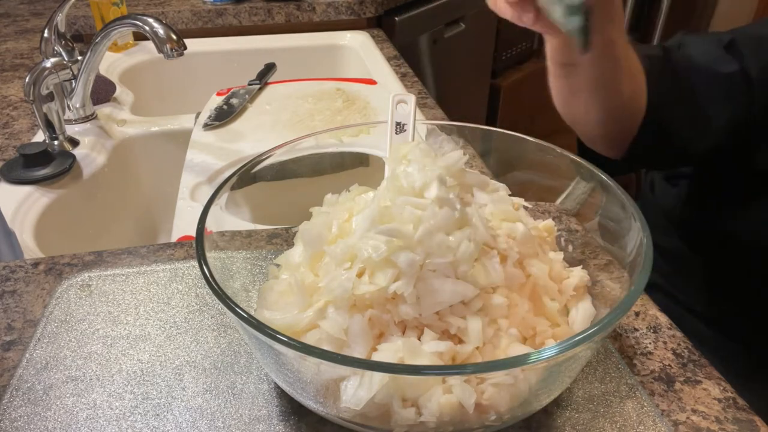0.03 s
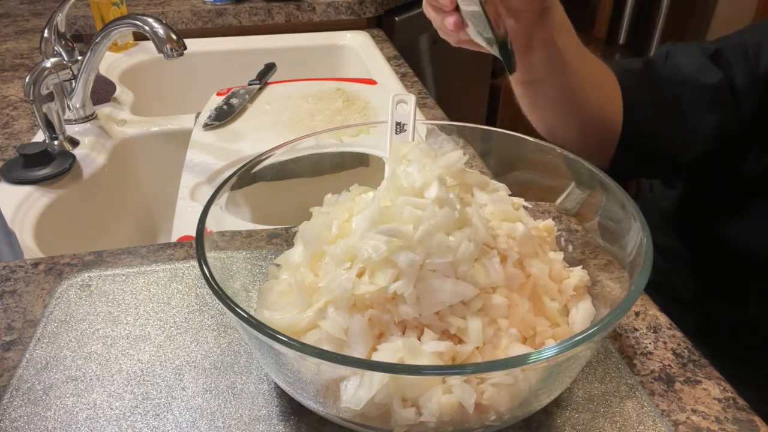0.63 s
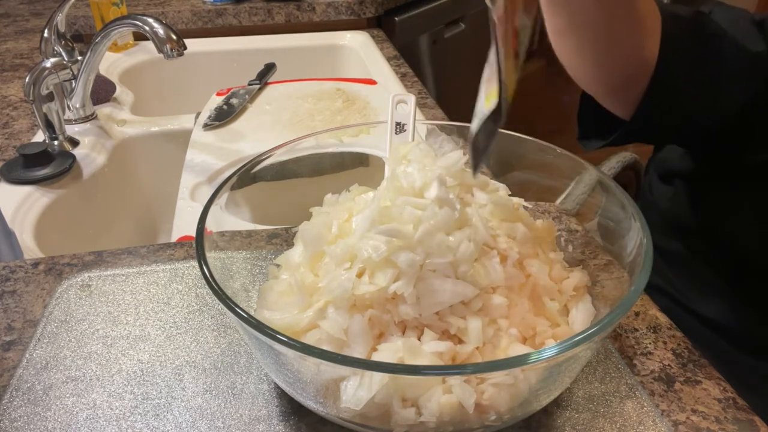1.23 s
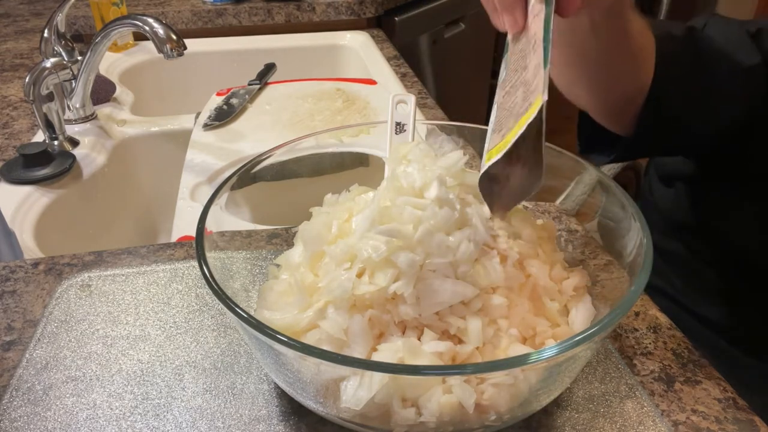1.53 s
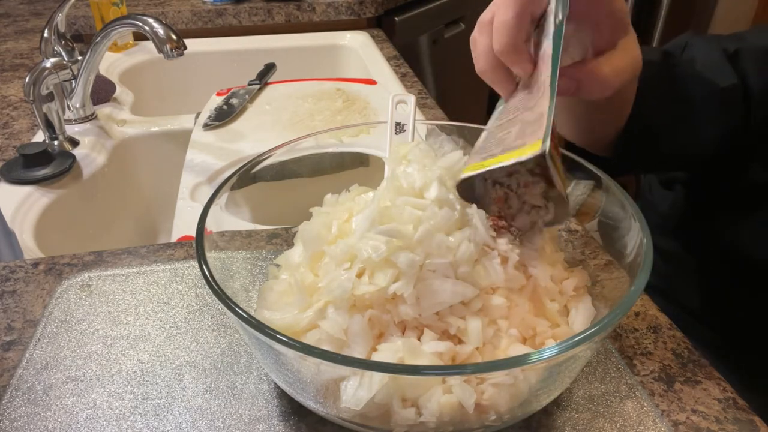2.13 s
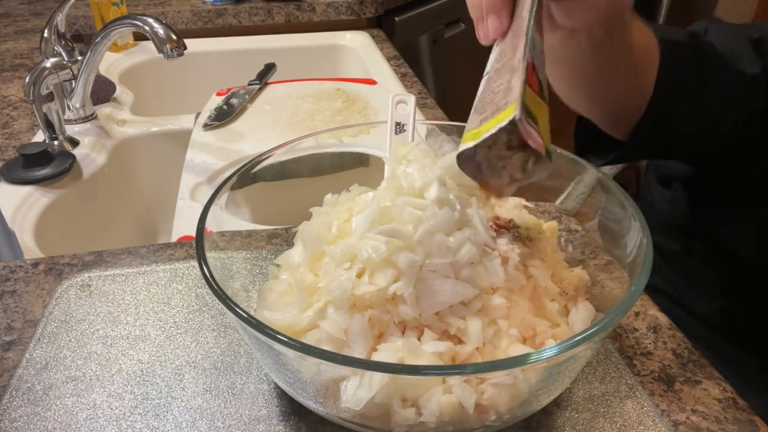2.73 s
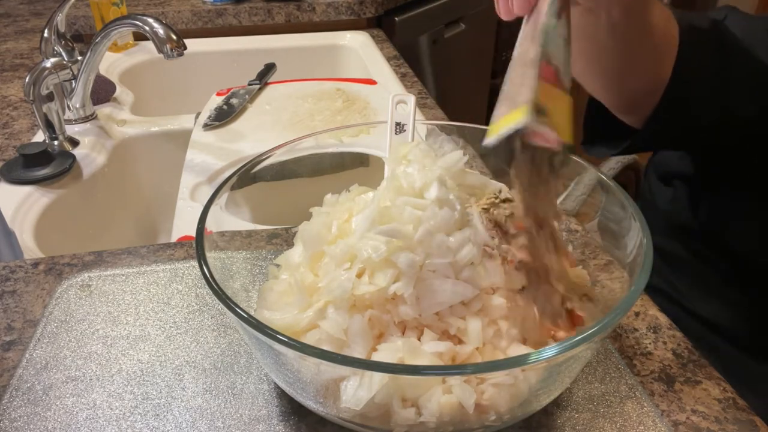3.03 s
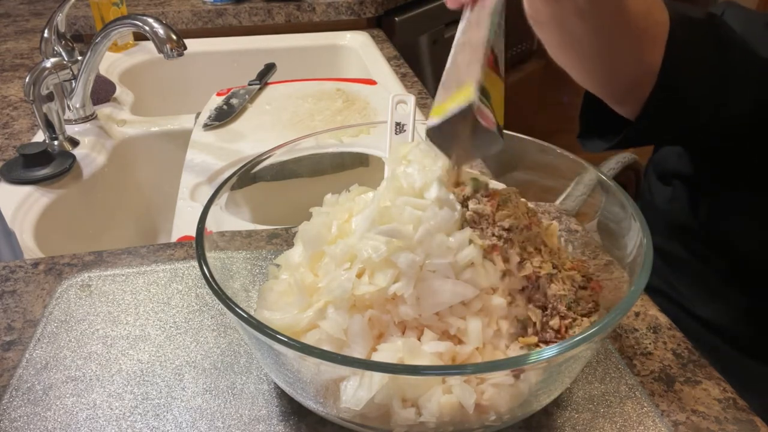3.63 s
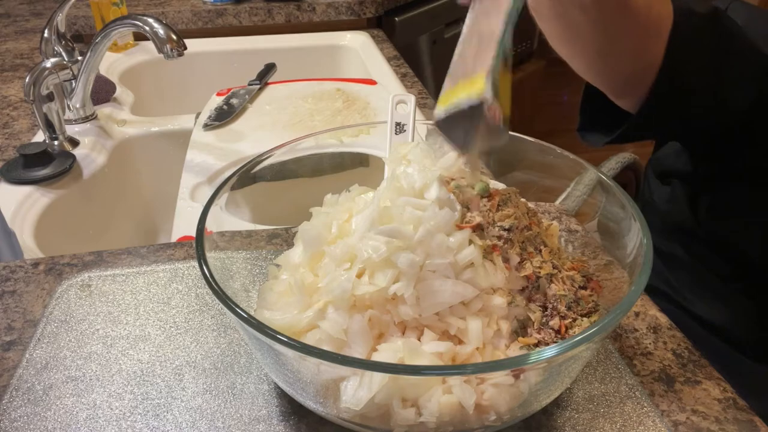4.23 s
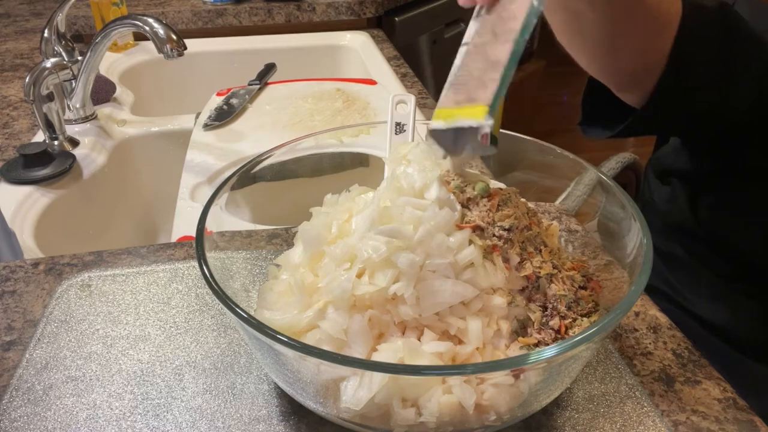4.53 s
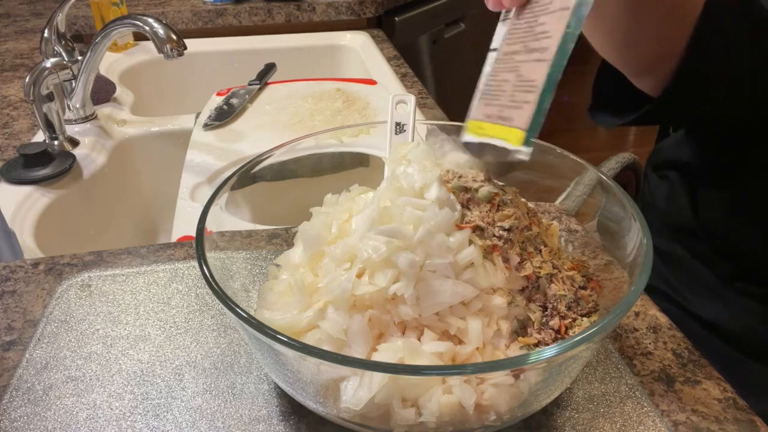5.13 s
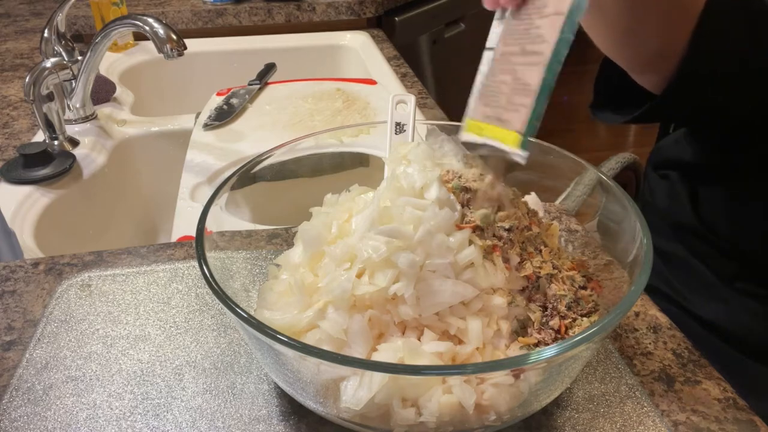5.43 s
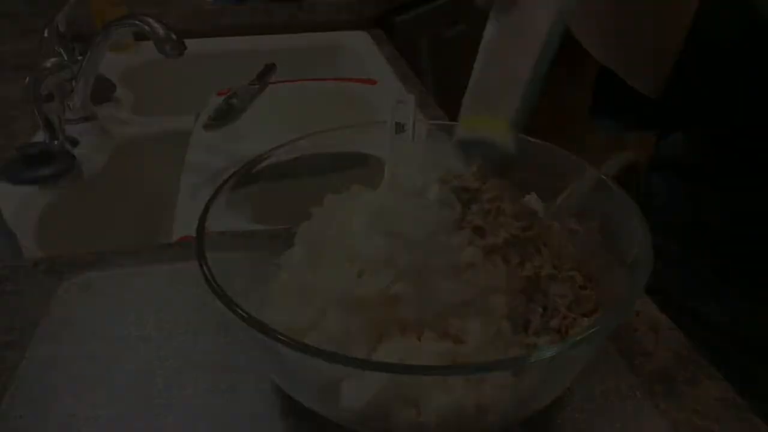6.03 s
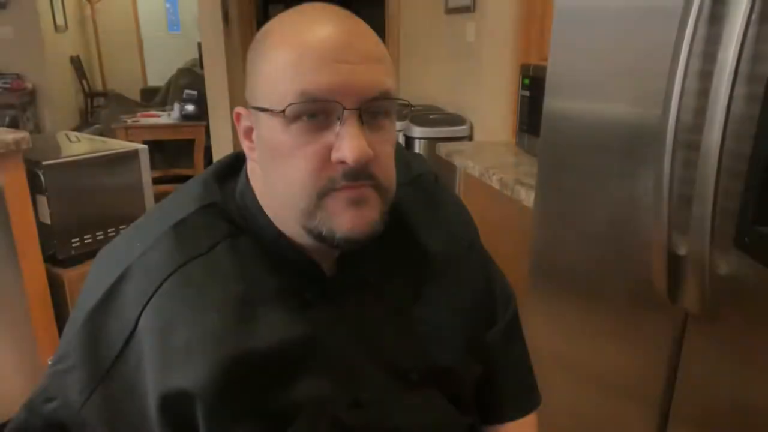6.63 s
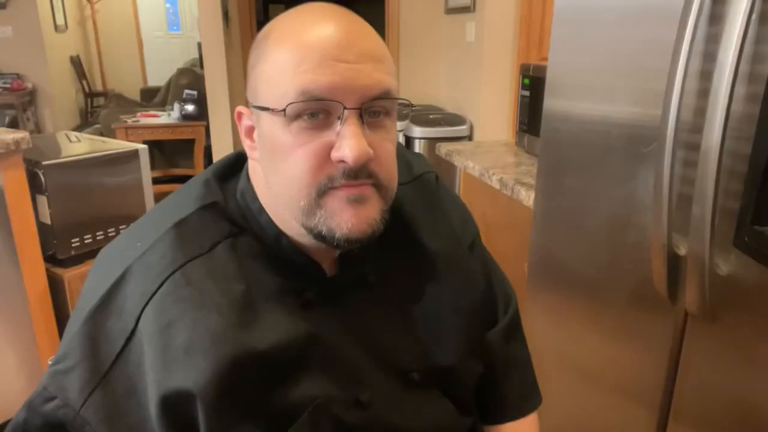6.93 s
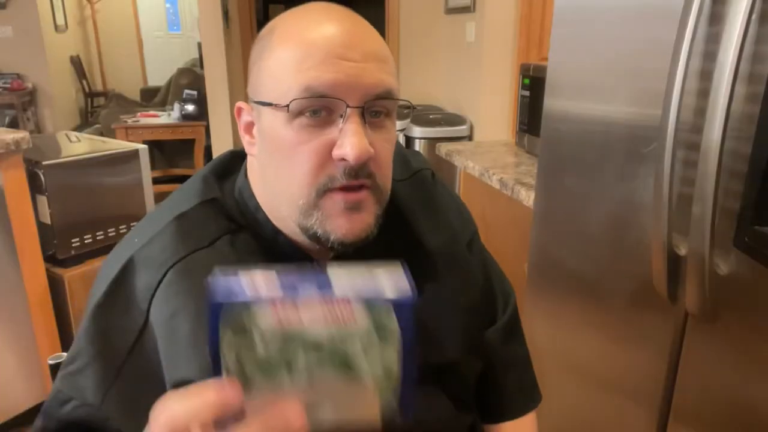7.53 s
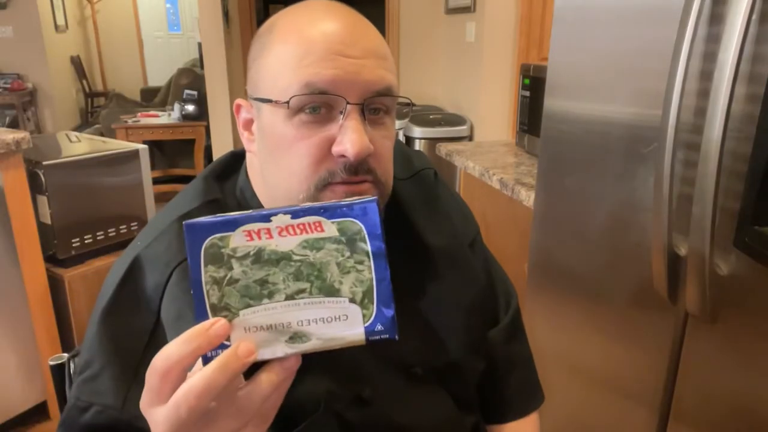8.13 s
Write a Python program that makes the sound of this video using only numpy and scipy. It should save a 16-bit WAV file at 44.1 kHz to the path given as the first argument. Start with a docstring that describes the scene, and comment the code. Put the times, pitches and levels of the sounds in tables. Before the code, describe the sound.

A stiff paper packet crinkles as dry mix is shaken into a glass bowl, then a small carton is softly handled over an appliance hum.

```python
"""A stiff paper packet is opened and shaken out over a glass bowl in a small kitchen.
Creases snap, walls rustle and the foil lining ticks; the dry mix slides out in surges and soft thuds.
At 6.28 s the scene cuts to a quieter spot in the room: a small carton is handled and lifted with
a hollow bump. An appliance motor hums throughout.
Friction and flow are filtered grain impacts; snaps and taps are noise bursts through resonances."""
import sys
import numpy as np
from scipy import signal
from scipy.fft import rfft, irfft, next_fast_len
from scipy.io import wavfile
from scipy.ndimage import uniform_filter1d, map_coordinates

SR = 44100
rng = np.random.default_rng(int(sys.argv[2]) if len(sys.argv) > 2 else 0)


def bounce(signal):
    """Save signal as a 16-bit WAV file at the path given by the first command-line argument."""
    frames = np.transpose(np.atleast_2d(signal))
    limited = np.clip(frames, -1, 1)
    pcm = np.round(limited * 32767).astype(np.int16)
    wavfile.write(sys.argv[1], SR, pcm)


N = 364574
TIME = np.arange(N) / SR
CUT_S = 6.28

# room noise spectrum (frequency [Hz], level [dB])
ROOM_TONE = [(20, -10), (45, -0.5), (80, 3.5), (120, 2), (190, -13), (280, -8), (500, -19.5), (1300, -26.5),
             (2500, -35), (8000, -48.5), (16000, -60.5)]
# motor and mains tones at the bowl, at the carton (frequency [Hz], level [dB])
NEAR_HUM = [(59.2, -53), (119.9, -72), (174.3, -75), (177.7, -72.5)]
FAR_HUM = [(59.2, -60.5), (174.3, -79.5), (177.6, -74.5)]
# microphone response to sound from the counter (frequency [Hz], gain [dB])
MIC_RESPONSE = [(100, 14.5), (270, -5), (400, -1.5), (570, -4), (715, 4.5), (880, -3), (1080, -1),
                (1400, -2), (1750, -2.5), (2150, -1), (2400, -1), (4000, 3), (8000, -1.5), (12000, -7.5),
                (16000, -4)]
# left port lag: packet upright, packet tipped, carton (frequency [Hz], phase [rad])
LAG_UPRIGHT = [(300, 0), (1380, 0), (1640, .9), (3190, .4), (4740, 1), (6290, .2), (7600, 3.5), (9560, 2.9),
               (10900, 0), (12300, 0), (13200, -2.9), (15100, -3.3), (16400, -4.7)]
LAG_TIPPED = [(300, 0), (2070, .6), (2500, 1.6), (3700, .4), (4570, 2.1), (5860, .8), (7150, 3.8),
              (9560, 2.9), (10900, 0), (12300, 0), (13200, -2.9), (15100, -3.2), (16400, -6.4)]
LAG_CARTON = [(0, 0), (2240, 1.9), (4200, 3.4), (5430, 5.5), (6460, 5.3), (8350, 3.1), (9470, 3.2),
              (10700, 0), (12300, 0), (13300, -3), (15300, -3.2)]

# hand and sleeve on the carton (time [s], rise [s], fall [s], rub [dB], hiss [dB])
SLIDES = [(6.36, 0.073, 0.09, -64.5, -76.5), (6.61, 0.015, 0.08, -75.5, -67.5),
          (6.821, 0.034, 0.058, -71, -65), (7.091, 0.043, 0.069, -60.5, -64), (7.285, 0.055, 0.1, -59, -66),
          (7.41, 0.038, 0.044, -55.5, -65), (7.501, 0.049, 0.16, -63.5, -69),
          (7.96, 0.027, 0.031, -80.5, -73)]
# card friction spectra (frequency [Hz], level [dB])
CARTON_RUB = [(150, 10), (350, 5), (550, 2.5), (750, 9), (1100, 0.5), (1450, 1), (2000, 1.5), (2800, -1.5),
              (4500, -12)]
CARTON_HISS = [(1500, -11), (2800, -1.5), (4500, -4), (7000, -5), (10000, -6), (16000, -11.5)]
# fingers tapping the carton (time [s], panel [dB], panel [Hz], scratch [dB])
TAPS = [(6.415, -56.5, 960, -63.5), (6.6105, -57, 783, -85), (6.841, -56, 837, -68),
        (6.977, -61, 935, -93.5), (7.0454, -55.5, 990, -62.5), (7.097, -53.5, 990, -78),
        (7.153, -51, 1430, -66), (7.2387, -42, 1280, -45.5), (8.0743, -64, 1165, -85.5)]
# carton bumps on lifting (time [s], level [dB], pitch [Hz])
BUMPS = [(7.403, -38, 367), (7.4142, -40.5, 306), (7.4419, -44.5, 355)]

# resonances of the half-open pouch, of its side panels (centre [Hz], width [Hz], gain [dB])
POUCH_MODES = [(382, 370, -2.5), (722, 60, -7), (834, 56, -9.5), (1075, 98, -2), (1400, 200, -6.5),
               (2050, 49, -4), (2520, 140, -13.5)]
PANEL_MODES = [(458, 220, -15), (690, 220, -12), (1030, 140, -6), (1450, 250, 1), (2096, 300, -1.5)]
# spectra: rubbed paper, powder, scraping walls, buckling walls (frequency [Hz], level [dB])
PAPER_HISS = [(1500, -19.5), (2800, -1.5), (4000, -7), (5500, -8.5), (8000, 1), (10000, -4.5),
              (12500, -1.5), (16000, -19.5)]
POWDER_HISS = [(1500, -5), (2800, -19.5), (4000, -5), (6000, -2), (8000, 3.5), (10000, 0.5), (12500, 2),
               (16000, -13)]
SCRAPE_SPECTRUM = [(1200, -35), (1750, 11), (2600, 8), (3300, 3), (4300, 1), (5200, -30), (9000, -47)]
BUCKLE_SPECTRUM = [(170, -15.5), (260, -1), (370, 0.5), (520, -13.5), (900, -15.5), (2000, -38)]
# grip friction on the packet (time [s], level [dB])
GRIP = [(0, -90), (.32, -81), (.7, -64), (.85, -66), (1.1, -58), (1.75, -58.5), (2.1, -67), (2.48, -71),
        (2.62, -71.5), (2.73, -65.5), (2.82, -56), (3.17, -55), (3.37, -68.5), (3.6, -64), (3.78, -72),
        (4.05, -67.5), (4.33, -64.5), (4.39, -70), (4.48, -67), (4.54, -71), (4.7, -68), (4.9, -67.5),
        (5.14, -67), (5.3, -59.5), (5.55, -61), (5.63, -72), (5.85, -73), (6.05, -76)]
# fingers squeezing the packet open (time [s], rise [s], rustle [dB], hiss [dB])
RUBS = [(.03, 0.065, -54, -57.5), (0.243, 0.032, -61.5, -68), (.47, 0.087, -61, -61.5),
        (.6, 0.033, -74, -61), (.93, 0.019, -53, -48.5), (1.176, 0.04, -53.5, -49.5),
        (1.331, 0.014, -50.5, -49.5), (1.511, 0.066, -52.5, -51.5), (1.605, 0.053, -48.5, -48.5),
        (1.89, 0.081, -46.5, -50.5), (2.2, 0.11, -52.5, -59), (2.505, 0.025, -56, -58.5)]
# shakes throwing the mix (time [s], rise [s], mix [dB], walls [dB])
SHAKES = [(2.897, 0.024, -45.5, -71), (3.024, 0.024, -45, -57.5), (3.08, 0.018, -50, -73),
          (3.157, 0.025, -43, -60), (3.28, 0.028, -54.5, -76), (3.42, 0.023, -53.5, -74),
          (3.5, 0.022, -56, -63), (3.581, .024, -49.5, -61), (3.703, 0.029, -58.5, -71),
          (3.86, 0.031, -56.5, -51), (4.003, 0.025, -53.5, -64), (4.095, 0.019, -60, -55),
          (4.126, 0.0041, -59, -63), (4.159, 0.012, -48, -71), (4.237, .012, -66, -57.5),
          (4.305, 0.026, -57.5, -67), (4.445, 0.029, -57, -53.5), (4.612, .014, -65, -70),
          (4.643, 0.0044, -57, -80), (4.731, 0.012, -54, -64), (4.78, 0.028, -57.5, -82),
          (4.84, 0.017, -58, -84), (4.89, 0.0089, -47, -54.5), (4.925, .02, -46, -61),
          (5.018, 0.016, -51, -71), (5.075, 0.017, -50.5, -56), (5.21, 0.036, -56.5, -76),
          (5.271, 0.0094, -50.5, -68), (5.357, 0.013, -43.5, -59), (5.378, 0.0067, -45, -54),
          (5.445, 0.025, -61, -72), (5.51, 0.017, -46.5, -65), (5.607, 0.0062, -63, -87),
          (5.659, 0.007, -60, -86), (5.686, 0.0095, -60, -84), (5.81, .008, -57, -81),
          (5.988, 0.013, -68.5, -87), (6.139, 0.023, -50, -62), (6.216, 0.016, -56.5, -66),
          (6.269, 0.016, -55.5, -70)]
# walls scraping, walls buckling (time [s], rise [s], fall [s], level [dB])
SCRAPES = [(2.278, 0.019, 0.098, -57), (2.45, 0.02, 0.023, -55.5)]
BUCKLES = [(.055, .01, 0.029, -55), (2.38, 0.01, 0.016, -61), (2.745, 0.0088, 0.013, -58),
           (3.235, 0.014, 0.016, -66), (4.14, .016, 0.013, -53), (5.41, 0.0084, 0.013, -49),
           (5.448, .008, 0.01, -52), (5.73, 0.0089, 0.022, -56.5), (6.025, 0.0072, 0.022, -61.5),
           (6.165, 0.014, 0.016, -53.5)]
# foil lining ticks (time [s], level [dB])
FOIL_TICKS = [(.2154, -64), (0.253, -59), (0.486, -47), (.583, -52.5), (.754, -58), (0.9407, -47),
              (1.0405, -53), (1.157, -43.5), (2.222, -56), (2.372, -58), (2.454, -56), (2.801, -48),
              (3.348, -56), (3.3883, -58), (3.4152, -59), (3.5469, -55), (3.798, -58), (3.8562, -45.5),
              (3.8786, -48), (3.98, -56), (4.0073, -53), (4.0777, -55), (4.244, -50.5), (4.8815, -60),
              (5.071, -45), (5.093, -62), (5.268, -55), (5.358, -47), (5.7127, -49.5), (5.913, -55)]
# clumps landing (time [s], level [dB], pitch [Hz], pouch [dB])
THUDS = [(2.866, -34.5, 1330, -55), (3.144, -37, 1430, -60), (3.171, -28.5, 1510, -51),
         (3.264, -38, 1580, -67), (3.4, -32, 1270, -50), (3.421, -31, 1450, -54), (3.439, -39, 1370, -64),
         (3.568, -32, 1500, -55), (3.594, -31.5, 1400, -68), (3.702, -43, 1190, -56),
         (3.861, -28, 1350, -43.5), (3.879, -28.5, 1060, -67), (4.006, -34, 1500, -54),
         (4.149, -42, 1440, -53), (4.307, -32.5, 1340, -50), (4.426, -32.5, 1370, -41),
         (4.457, -35.5, 1310, -62), (4.506, -34.5, 1560, -53), (5.413, -38.5, 1440, -48)]
# crease snaps (time [s], panel [dB], panel [Hz], pouch [dB], crack [dB], crack [Hz], length [s])
SNAPS = [(0.031, -37.5, 1510, -42.5, -38, 3400, 0.00067), (0.154, -45, 1300, -50, -59, 4000, 0.00086),
         (.2182, -52, 1700, -48, -49.5, 4500, 0.0016), (0.3445, -50, 1620, -56, -58.5, 3800, 0.0013),
         (0.388, -57, 1550, -60, -63, 4000, 0.0042), (0.485, -56, 2100, -79, -50, 5500, 0.0015),
         (0.604, -56, 1670, -77, -49.5, 4800, 0.0026), (0.654, -54, 2070, -61, -78, 4000, 0.00078),
         (0.755, -61, 1760, -60, -59.5, 3980, 0.00087), (0.879, -54, 1490, -60, -53.5, 4000, .0094),
         (0.915, -41, 1820, -60, -40, 3900, .0028), (0.941, -48, 1720, -62, -40.5, 4540, 0.002),
         (1.021, -50.5, 1420, -72, -65, 4000, 0.0084), (1.041, -65, 1470, -50, -52, 4500, .0025),
         (1.091, -47, 2390, -75, -51.5, 3780, .0041), (1.154, -42.5, 2190, -50.5, -38.5, 3450, 0.00029),
         (1.56, -44.5, 1140, -64, -62, 4000, 0.0041), (1.778, -46.5, 2540, -56, -45, 4350, .0005),
         (1.814, -41, 950, -45, -58, 4000, 0.0014), (1.83, -47, 1010, -45.5, -57, 4000, 0.0039),
         (1.849, -37.5, 790, -50, -59, 4000, 0.0034), (1.857, -43, 745, -63, -58, 4000, 0.0019),
         (1.92, -28.5, 1130, -41.5, -26, 4150, 0.0022), (1.9305, -38, 1008, -45.5, -39, 4000, .003),
         (1.9405, -39, 980, -55, -39, 4000, .003), (1.976, -39, 1810, -41, -39, 5900, .0021),
         (2.0284, -40, 1950, -36, -38, 4250, 0.0015), (2.064, -48.5, 1140, -51, -68, 4000, 0.0015),
         (2.151, -43.5, 1020, -46, -70, 4000, 0.0052), (2.159, -47, 845, -43, -68, 4000, 0.0049),
         (2.264, -35, 1400, -39, -44.5, 3130, 0.00053), (2.27, -47, 1170, -51.5, -65, 3200, .0025),
         (2.436, -43, 1270, -51.5, -38, 6100, 0.0022), (2.54, -54.5, 1260, -48.5, -60.5, 4000, 0.0018),
         (2.6783, -46, 1500, -68, -48.5, 4300, 0.0042), (2.756, -55.5, 1140, -62, -74, 4000, .0034),
         (2.803, -46.5, 1800, -55, -42, 3940, 0.0017), (3.9305, -60, 900, -55, -52.5, 6070, 0.0021),
         (4.087, -47.5, 1280, -60, -49, 4220, 0.0074), (4.234, -46.5, 1460, -49.5, -64, 3400, 0.0074),
         (4.334, -57, 1170, -70, -53.5, 5000, .0007), (4.58, -53, 1760, -49, -48.5, 5400, .0035),
         (4.66, -48.5, 1480, -57.5, -56, 4560, 0.0016), (5.02, -56, 1830, -51.5, -47.5, 5500, .002),
         (5.061, -50, 1800, -52, -60, 4000, .003), (5.102, -47, 1440, -68, -53, 3420, 0.0022),
         (5.159, -54.5, 1430, -57.5, -49.5, 5500, .004), (5.21, -53, 1550, -77, -54, 4500, 0.0039),
         (5.272, -56, 2080, -58, -48, 4800, .0034), (5.3573, -39.5, 1410, -45, -62, 4000, 0.008),
         (5.3578, -38.5, 1310, -46, -57, 4000, .004), (5.559, -56, 1820, -59, -52, 3800, 0.0025),
         (5.718, -59.5, 2170, -52, -60, 4500, .0005), (5.756, -72, 900, -57, -62, 5030, .0033),
         (5.791, -70, 2470, -75, -51.5, 5060, 0.0019), (5.806, -67, 1020, -67, -78, 4000, .007),
         (5.839, -65, 1830, -58, -60.5, 4800, .0015), (5.967, -64, 1100, -78, -66, 4000, 0.0058),
         (6.066, -65.5, 800, -56, -77, 4000, 0.0055), (6.194, -55, 1500, -49.5, -57, 4000, 0.0024),
         (6.221, -46, 1460, -47, -58, 3600, 0.0029)]


def undb(db):
    """Decibels to gain."""
    return 10 ** (np.asarray(db) / 20)


def unit(x):
    """Scale to rms 1."""
    return x / np.sqrt(np.mean(x ** 2))


def struck(x, db):
    """Set the rms level of the first 10 ms."""
    return x * undb(db) / np.sqrt(np.mean(x[:SR // 100] ** 2))


def add(track, time_s, x):
    """Mix x into the track at time_s."""
    i = max(int(time_s * SR), 0)
    track[i:i + len(x)] += x[:N - i]


def colour(x, spectrum):
    """Filter by a (frequency [Hz], gain [dB]) outline; roll off below its first point."""
    hz, db = np.transpose(spectrum)
    grid_hz = np.maximum(np.fft.rfftfreq(2 * N, 1 / SR), 1)
    gain = undb(np.interp(np.log(grid_hz), np.log(hz), db)) * np.minimum(grid_hz / hz[0], 1) ** 2
    size = next_fast_len(N + 4096)
    response = np.interp(np.fft.rfftfreq(size, 1 / SR), grid_hz, gain)
    return irfft(rfft(x, size) * response, size)[..., :N]


def ring(x, hz, width_hz):
    """One resonance, unity gain at centre."""
    q = hz / min(width_hz, SR / 4)
    return signal.lfilter(*signal.iirpeak(min(hz, SR / 3), q, fs=SR), x)


def band(x, low_hz, high_hz, order=2):
    """Causal band-pass."""
    sos = signal.butter(order, [low_hz, min(high_hz, .45 * SR)], "band", fs=SR, output="sos")
    return signal.sosfilt(sos, x)


def walk(rate_hz):
    """Random drift, spread near 1."""
    knots = rng.standard_normal(4000)
    return 1.2 * np.interp(TIME * rate_hz, np.arange(len(knots)), knots)


def grains(per_s, spread_db, clump_db):
    """Tiny impacts in clumps: mostly weak, a few strong."""
    size = undb(spread_db * np.minimum(rng.exponential(size=N), 5))
    hits = (rng.random(N) < per_s / SR) * rng.choice([-1, 1], N)
    return hits * size * undb(clump_db * walk(rate_hz=140))


def texture(spectrum, per_s, spread_db, clump_db):
    """Coloured grains at rms 1."""
    return unit(colour(grains(per_s, spread_db, clump_db), spectrum))


def burst(decay_s, rise_s, tail_db, tail_s):
    """A sheet gives way in ragged steps, then chatters as it settles."""
    t = TIME[:4096]
    steps = undb(2.5 * np.interp(t, np.linspace(0, t[-1], 64), rng.standard_normal(64)))
    shape = (1 - np.exp(-t / rise_s)) * (np.exp(-t / decay_s) + undb(tail_db) * np.exp(-t / tail_s))
    return rng.standard_normal(len(t)) * shape * steps


def strokes(rows):
    """Envelope of swells summed in power; rows are (time [s], rise [s], fall [s], level [dB])."""
    power = np.zeros(N)
    for time_s, rise_s, fall_s, db in rows:
        near = slice(*np.searchsorted(TIME, [time_s - 4 * rise_s, time_s + 4 * fall_s]))
        t = TIME[near] - time_s
        power[near] += undb(db) ** 2 * np.exp(-(t / np.where(t < 0, rise_s, fall_s)) ** 2)
    return np.sqrt(power)


def motor(tones):
    """Appliance hum, wavering slightly in phase and level."""
    hum = sum(undb(db) * np.sqrt(2) * np.sin(2 * np.pi * hz * TIME + .068 * walk(rate_hz=3.8))
              for hz, db in tones)
    return hum * undb(.5 * walk(rate_hz=4.9))


def background(at_bowl):
    """Motor over room noise; both fainter at the carton, with a low rumble."""
    rumble = undb(-66) * unit(band(rng.standard_normal(N), 46, 72))
    hum = at_bowl * motor(NEAR_HUM) + (1 - at_bowl) * (motor(FAR_HUM) + rumble)
    mid, left, right = (unit(colour(rng.standard_normal(N), ROOM_TONE)) for _ in range(3))
    air = (mid + 1.95 * np.array([left, right])) * undb(-73.7 + 4.9 * at_bowl)
    return hum * undb([[-.8], [.7]]) + air


def kitchen(x, wet_db, t60_s, counter_db, patterns):
    """Counter and wall reflections; the patterns crossfade as the hands move."""
    out = np.zeros((2, N))
    t = TIME[:SR // 2]
    walls = undb(wet_db) * 1000 ** (-t / t60_s) / np.sqrt(t60_s * SR / np.log(1000) / 2)
    counter = undb(counter_db) * np.exp(-t / .004) / np.sqrt(.002 * SR)
    place = TIME * 13
    for k in range(patterns):
        share = np.sqrt(np.clip(1 - abs((place - k + 1) % patterns - 1), 0, 1))
        noise = rng.standard_normal((3, len(t)))
        # long waves arrive partly alike at both ports
        field = band(noise[:2], 150, 7000) + .34 * band(noise[2], 120, 3200, order=1)
        response = field * (walls + counter) * (t > .0007)
        out += signal.fftconvolve((x * share)[None], response, axes=1)[:, :N]
    return out


def direct(x, lag):
    """Direct sound reaches the two microphone ports out of phase."""
    size = next_fast_len(N + SR)
    lag_rad = np.interp(np.fft.rfftfreq(size, 1 / SR), *np.transpose(lag))
    lead = np.exp(1j * lag_rad / 2)
    return irfft(rfft(x, size) * np.array([lead.conj(), lead]), size)[:, :N]


def carton_slides():
    """Friction on card: sliding strokes over the floor of resting fingers."""
    rub = np.hypot(undb(-91.5), strokes((s, rise, fall, db) for s, rise, fall, db, _ in SLIDES))
    hiss = np.hypot(undb(-83), strokes((s, rise, fall, db) for s, rise, fall, _, db in SLIDES))
    return (rub * texture(CARTON_RUB, per_s=7000, spread_db=1, clump_db=2)
            + hiss * texture(CARTON_HISS, per_s=15000, spread_db=5.5, clump_db=0))


def carton_taps(scratch_hz=4900):
    """A finger rings the panel and the air in the box; the nail scratches."""
    out = np.zeros(N)
    for time_s, panel_db, panel_hz, scratch_db in TAPS:
        touch = burst(decay_s=.0055, rise_s=.003, tail_db=-16, tail_s=.014)
        panel = struck(band(ring(touch, panel_hz, .62 * panel_hz), 330, 1800), panel_db)
        scratch = struck(band(ring(touch, scratch_hz, 2 * scratch_hz), 2430, 6650), scratch_db)
        hollow = struck(band(touch, 360, 400), panel_db - 24.5)
        add(out, time_s, panel + hollow + scratch)
    return out


def carton_bumps(rise_s=.0055):
    """The hollow box bumps and scuffs as it is lifted."""
    out = np.zeros(N)
    t = TIME[:4096]
    swell = (t / rise_s * np.exp(1 - t / rise_s)) ** 2
    for time_s, db, hz in BUMPS:
        add(out, time_s - .0015, undb(db) * swell * np.sin(2 * np.pi * hz * t))
        scuff = burst(decay_s=.0052, rise_s=.00078, tail_db=-18, tail_s=.017)
        add(out, time_s - .002, struck(band(scuff, 750, 3900, order=1), db - 14.5))
    return out


def pouch(x, size=1):
    """Air and walls of the packet ring, lower when opened wider."""
    return sum(undb(db) * ring(x, hz / size, width_hz) for hz, width_hz, db in POUCH_MODES)


def pouch_pop():
    """Pushed air in the pouch: a damped pop of random pitch."""
    push = burst(decay_s=.003, rise_s=.0012, tail_db=-22, tail_s=.011)
    pitch_hz = 345 * 2 ** rng.uniform(-.2, .2)
    return band(ring(push, pitch_hz, 240), 200, 540)


def flexing(x, depth=.11):
    """The pouch opens and closes in the hand, so its resonances wander."""
    drift_samples = np.cumsum(depth * walk(rate_hz=11))
    return map_coordinates(x, [np.arange(N) + drift_samples], order=3, mode="wrap")


def bending(x, swing_db=2.5):
    """Bending walls swell and fade each band separately; output rms 1."""
    lows = [signal.sosfiltfilt(signal.butter(3, hz, fs=SR, output="sos"), x)
            for hz in (500, 850, 1250, 1800)]
    bands = np.diff([np.zeros(N), *lows, x], axis=0)
    return unit(sum(part * undb(swing_db * walk(rate_hz=24)) for part in bands))


def buckles():
    """Slack paper gives in a dull flutter."""
    return strokes(BUCKLES) * texture(BUCKLE_SPECTRUM, per_s=2000, spread_db=1, clump_db=1)


def scrapes():
    """The walls drag over each other in fine catches as the mouth is spread."""
    return strokes(SCRAPES) * texture(SCRAPE_SPECTRUM, per_s=4500, spread_db=1, clump_db=1.5)


def foil_tick():
    """The lining flicks over in under a millisecond."""
    return band(burst(decay_s=.0004, rise_s=.0001, tail_db=-32, tail_s=.005), 3500, 13000, order=1)


def foil_ticks():
    """The lining ticks without moving a panel."""
    out = np.zeros(N)
    for time_s, db in FOIL_TICKS:
        add(out, time_s, struck(band(foil_tick(), 7000, 16000), db))
    return out


def thuds(flakes=7, scatter_s=.0077, lead_s=.02):
    """Clumps of mix land dead, with loose flakes just before and after."""
    out = np.zeros(N)
    for time_s, db, hz, pouch_db in THUDS:
        hits = np.zeros(SR // 10)
        late_s = np.clip(scatter_s * (rng.standard_normal(flakes) + .5), -lead_s, 2 * lead_s)
        flake_hits = undb(-6.5) * rng.uniform(.14, 1, flakes) * rng.choice([-1, 1], flakes)
        hits[((lead_s + late_s) * SR).astype(int)] = flake_hits
        hits[int(lead_s * SR)] = 1  # the clump
        body = band(hits, .64 * hz, 1.29 * hz, order=3)
        scuff = band(rng.standard_normal(len(hits)), 2500, 9000) * uniform_filter1d(abs(body), 128)
        thud = (body + .597 * scuff) / abs(body).max()
        add(out, time_s - lead_s, undb(db - 1.5) * thud)
        add(out, time_s, struck(pouch_pop(), pouch_db - 2))
    return out


def crinkles(count=70, spread_db=1.5, crack_hz=4300, length_s=.002):
    """Rows as in SNAPS: small creases give at random, louder under a firmer grip."""
    chance = rng.random((count, 5))
    time_s = (np.arange(count) + chance[:, 0]) * CUT_S / count
    db = np.interp(time_s, *np.transpose(GRIP)) - 2.5
    panel_db, pouch_db, crack_db = db + spread_db * (2 * chance[:, 1:4].T - 1)
    panel_hz = 1000 * 2 ** chance[:, 4]
    rows = zip(time_s, panel_db, panel_hz, pouch_db - .5, crack_db + 3.5)
    return [(*row, crack_hz, length_s) for row in rows]


def snaps(retune_octaves=.021):
    """A crease creaks under strain and flips: crack, foil tick, panel ring, pouch pop."""
    out = np.zeros(N)
    t = TIME[:SR // 100]
    strain = np.exp((t - t[-1]) / .0017)
    for time_s, panel_db, panel_hz, pouch_db, crack_db, crack_hz, length_s in SNAPS + crinkles():
        flip = burst(decay_s=.8 * length_s, rise_s=.45 * length_s, tail_db=-24, tail_s=.009)
        hollow = pouch(flip, size=2 ** (retune_octaves * rng.standard_normal()))
        panel = band(ring(flip, panel_hz, .51 * panel_hz) + hollow, .5 * panel_hz, 2700)
        split = burst(decay_s=.4 * length_s, rise_s=.25 * length_s, tail_db=-26, tail_s=.007)
        crack = band(ring(split, crack_hz, .9 * crack_hz), .7 * crack_hz, 2.5 * crack_hz)
        snap = struck(panel, panel_db) + struck(crack, crack_db - 7)
        add(out, time_s + .0003, struck(foil_tick(), crack_db - 4.5))
        add(out, time_s - .0004, snap + struck(pouch_pop(), pouch_db - 2.5))
        creak = band(rng.standard_normal(len(t)), 620, 4600) * strain
        add(out, time_s - t[-1], struck(creak, max(panel_db, crack_db) - 15.5))
    return undb(1.5) * out


def handling(rub_fall_ratio=1.46, shake_fall_ratio=1.11, rebound_s=.019):
    """Envelopes of rustle, hiss, wall flex and moving mix; the walls spring back after each shake."""
    grip = undb(np.interp(TIME, *np.transpose(GRIP)))
    rubs = strokes((s, rise, rub_fall_ratio * rise, db) for s, rise, db, _ in RUBS)
    rub_hiss = strokes((s, rise, rub_fall_ratio * rise, db) for s, rise, _, db in RUBS)
    mix = strokes((s, rise, shake_fall_ratio * rise, db) for s, rise, db, _ in SHAKES)
    rebound = strokes((s + rebound_s, .022, .024, db) for s, _, _, db in SHAKES)
    rustle = np.hypot(grip, rubs)
    hiss = np.hypot(undb(3.5) * grip, rub_hiss)
    flex = np.sqrt((undb(-10.5) * rubs) ** 2 + rebound ** 2 + undb(-78.5) ** 2)
    return rustle, hiss, flex, mix


def rustle_and_pour():
    """Paper rubs and flexes; shakes throw flakes at the panels and powder out of the mouth."""
    rustle, hiss, flex, mix = handling()
    fibres = grains(per_s=3200, spread_db=3, clump_db=2.5)
    paper = bending(band(flexing(pouch(fibres)) + .31 * fibres, 680, 2500))
    walls = unit(band(ring(grains(per_s=2200, spread_db=1.2, clump_db=1.5), 310, 320), 160, 580))
    flakes = grains(per_s=1100, spread_db=2.5, clump_db=2)
    panels = sum(undb(db) * ring(flakes, hz, width_hz) for hz, width_hz, db in PANEL_MODES)
    rattle = bending(band(flexing(panels, depth=.08) + .2 * flakes, 350, 2500))
    rubbed = texture(PAPER_HISS, per_s=4400, spread_db=3, clump_db=1)
    powder = texture(POWDER_HISS, per_s=5000, spread_db=3, clump_db=2.8)
    crumbs = texture(POWDER_HISS, per_s=420, spread_db=3.2, clump_db=3.5)
    # once tipped, the mix takes over from the paper, then thins to crumbs
    pouring = np.interp(TIME, [2.65, 2.85], [.02, .8])
    empty = np.interp(TIME, [3.1, 3.6], [0, .7])
    stream = np.sqrt(1 - empty) * powder + np.sqrt(empty) * crumbs
    fine = np.sqrt(1 - pouring) * rubbed + np.sqrt(pouring) * stream
    fine *= np.hypot(hiss, undb(3.5) * mix)
    coarse = np.sqrt(1 - pouring) * rustle * paper
    coarse += rattle * np.hypot(np.sqrt(pouring) * rustle, undb(-2) * mix)
    # salt crystals tick on paper and glass
    salt = unit(band(grains(per_s=110, spread_db=3, clump_db=2), 5000, 15000, order=1))
    salt *= pouring * np.hypot(undb(-6) * hiss, undb(-11) * mix)
    return coarse + fine + walls * flex + salt


def scene():
    """Packet at the bowl, then the carton; stereo."""
    at_bowl = np.clip((CUT_S - TIME) / .006, 0, 1)
    tipped = np.interp(TIME, [2.55, 2.75], [0, 1])
    packet = snaps() + thuds() + foil_ticks() + scrapes() + buckles() + rustle_and_pour()
    packet = colour(packet, MIC_RESPONSE)
    carton = carton_slides() + carton_taps() + carton_bumps()
    bowl = direct(packet * (1 - tipped), LAG_UPRIGHT) + direct(packet * tipped, LAG_TIPPED)
    bowl += kitchen(packet, wet_db=-9.5, t60_s=.28, counter_db=-5.5, patterns=10)
    box = direct(carton, LAG_CARTON)
    box += kitchen(carton, wet_db=-5.5, t60_s=.55, counter_db=-3, patterns=8)
    foreground = at_bowl * undb(.09) * bowl + (1 - at_bowl) * undb(-4) * box
    return foreground * undb([[-.3], [.3]]) + background(at_bowl)


def record(dry):
    """Steep low-pass at 16 kHz."""
    return signal.sosfilt(signal.ellip(8, .2, 70, 16000, fs=SR, output="sos"), dry)


dry = scene()
out = record(dry)
bounce(out)
```